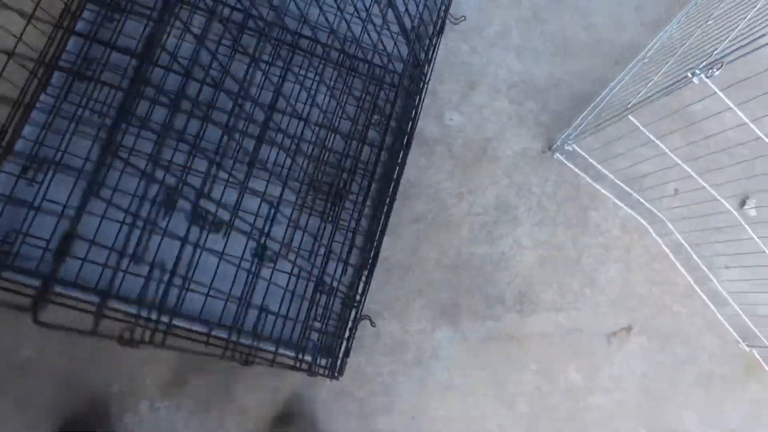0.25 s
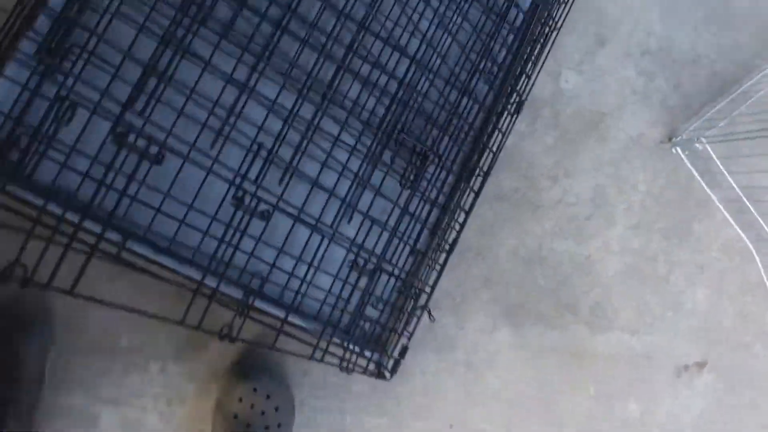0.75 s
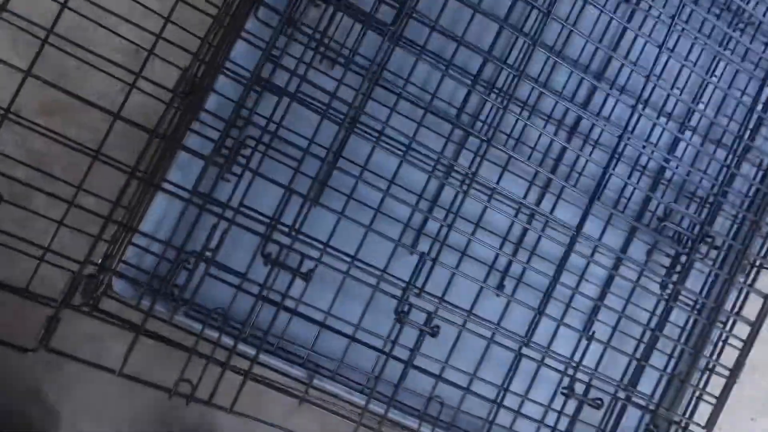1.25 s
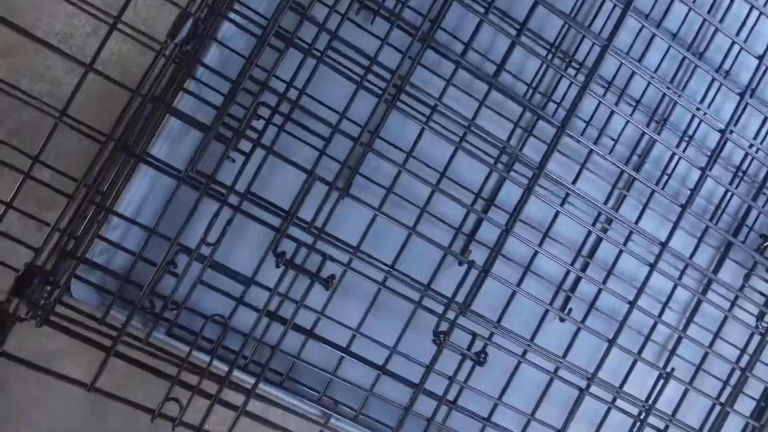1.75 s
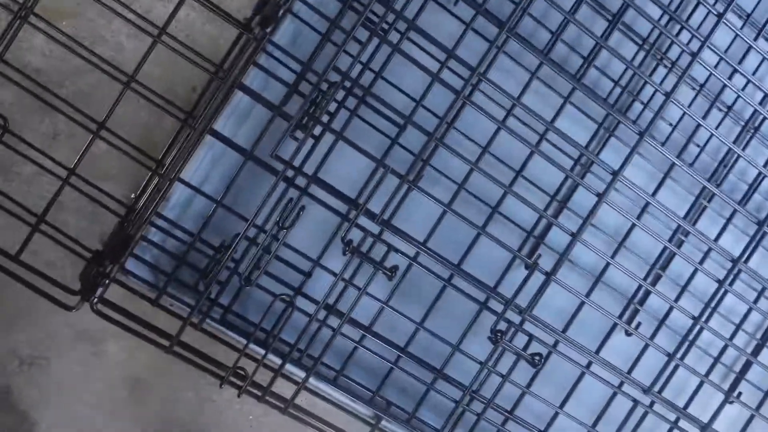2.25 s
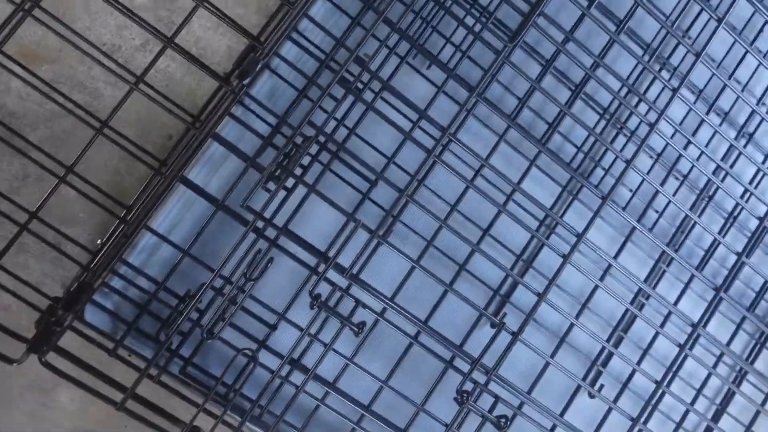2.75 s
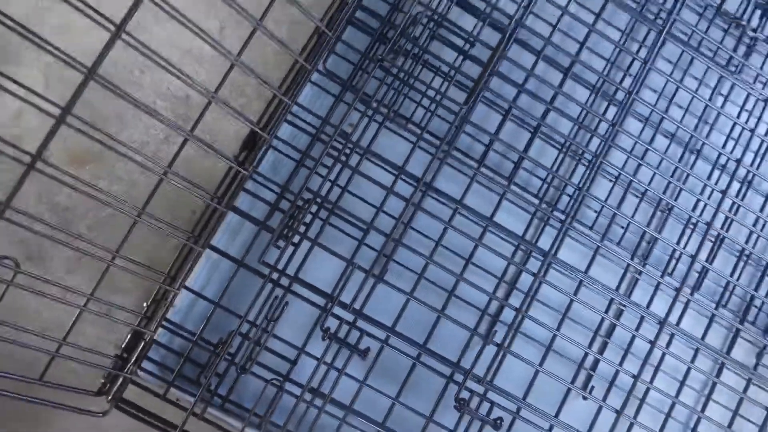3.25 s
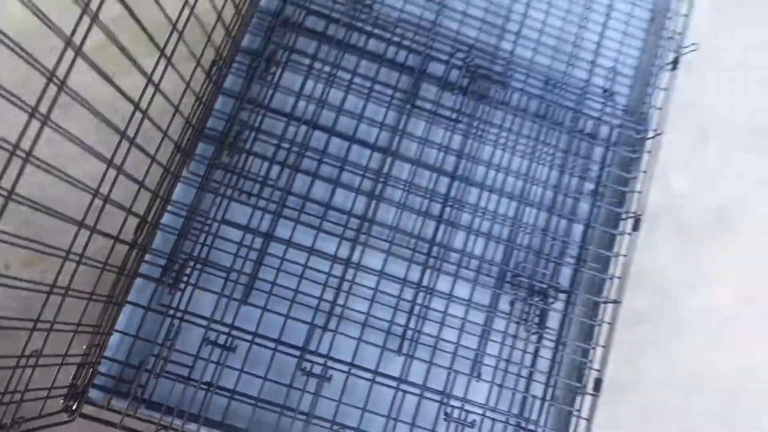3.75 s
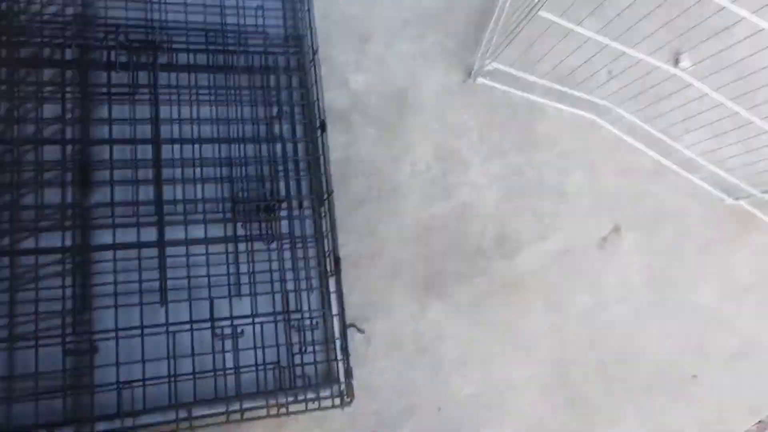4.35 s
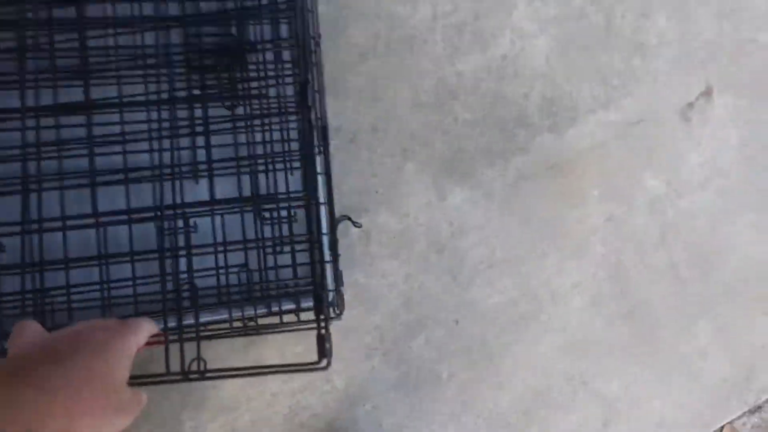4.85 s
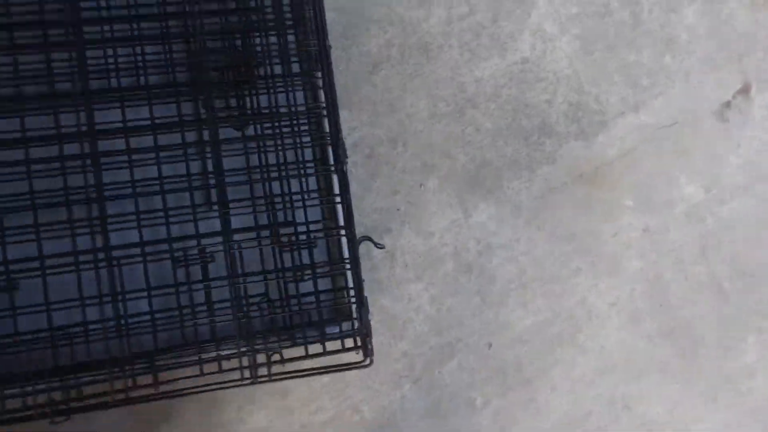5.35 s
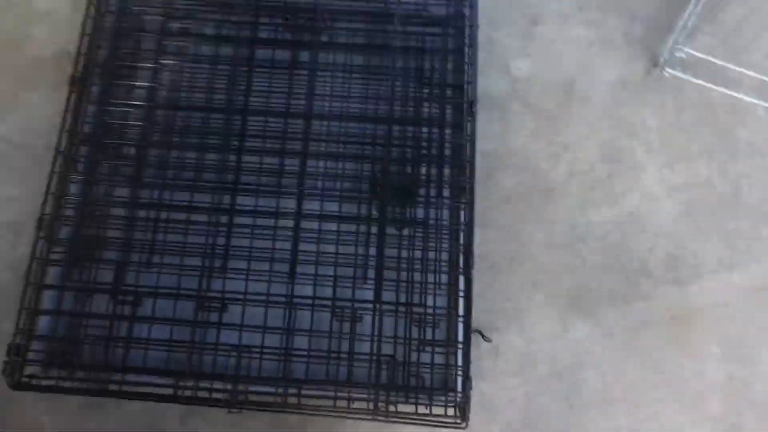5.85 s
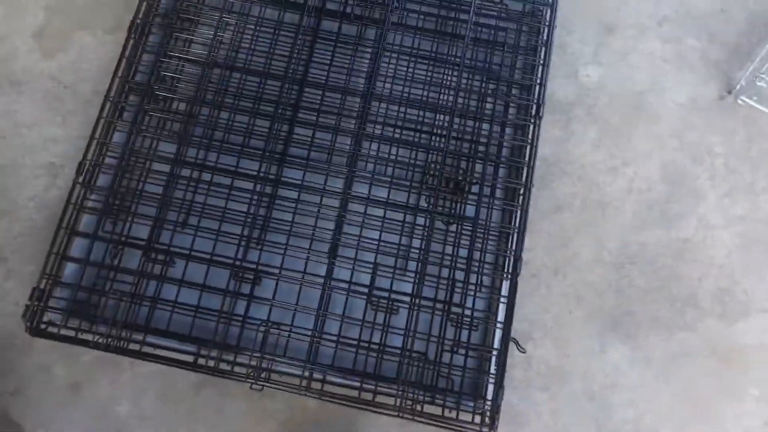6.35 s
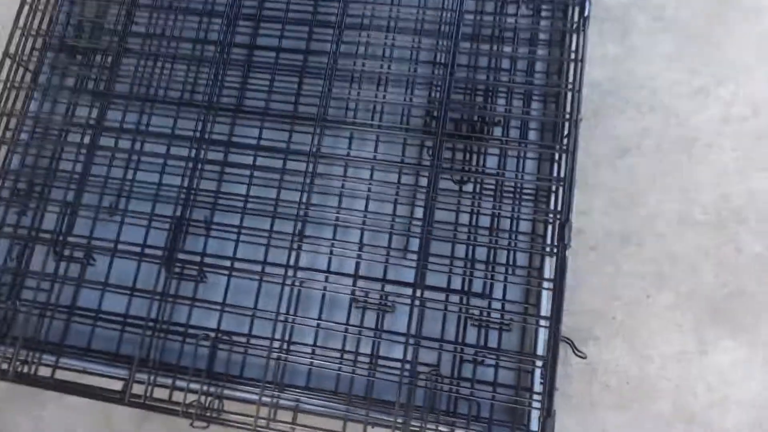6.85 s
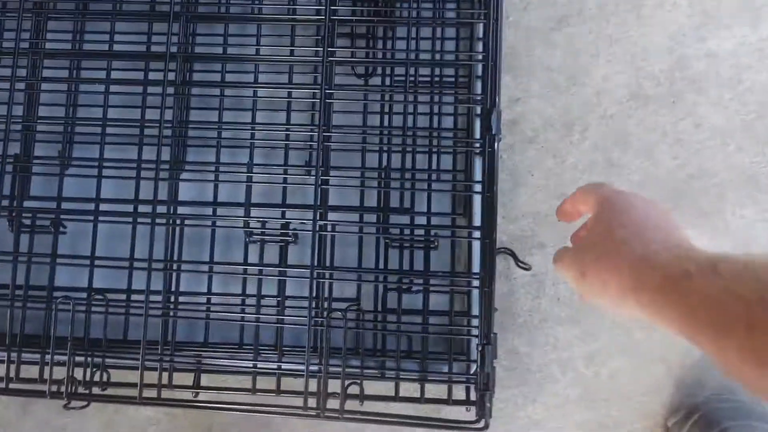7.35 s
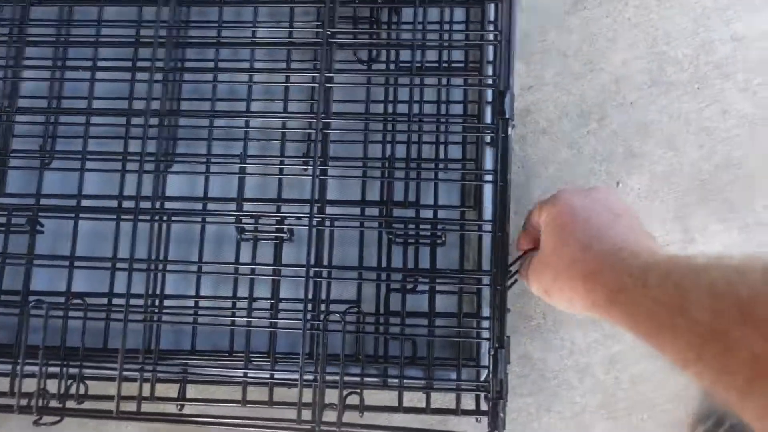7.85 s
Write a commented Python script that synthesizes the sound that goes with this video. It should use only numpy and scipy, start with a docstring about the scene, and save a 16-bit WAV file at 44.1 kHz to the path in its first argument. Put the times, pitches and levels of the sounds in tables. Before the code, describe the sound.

Many thin metal wires strike each other in swarms, bright and clattery, with duller frame knocks and a faint thump underneath. Two busy passages of clashing are separated by a lull with sparse ticks. After the second, the noise drops to thin jingling over quiet air, a soft shoe scuff and a few dry metal clicks. Close stereo pickup, with short echoes from hard walls and floor.

```python
"""Hard-walled space with a concrete floor, stereo microphone on a camera close to the action.
A folding steel wire crate is collapsed and dragged: swarms of tiny wire-on-wire contacts ring banks of
decaying modes for the frame, the mesh panels and the long and short wires. Shakes swell and die, blows
start bursts of rattle; tones of wires, tray and latch clicks ring out and the floor tray hums, all resonant
noise. Rumble, a groan, scuffing soles and a wavering hum are shaped noise too; sparse echoes answer over air."""
import sys
import numpy as np
from scipy import signal
from scipy.fft import rfft, irfft
from scipy.io import wavfile
from scipy.ndimage import uniform_filter1d

SR = 44100
rng = np.random.default_rng(int(sys.argv[2]) if len(sys.argv) > 2 else 0)


def bounce(signal):
    """Save signal as a 16-bit WAV file at the path given by the first command-line argument."""
    frames = np.transpose(np.atleast_2d(signal))
    limited = np.clip(frames, -1, 1)
    pcm = np.round(limited * 32767).astype(np.int16)
    wavfile.write(sys.argv[1], SR, pcm)


N = 357651  # length in samples

# Spectrum of the air noise, relative: pitch_hz, level_db
AIR_COLOUR = [(150, -35), (250, -44), (324, -0.5), (951, 5.5), (1020, 4), (1070, 0), (10800, -22),
              (11800, -43), (15800, -50)]
AIR_DB = -50  # rms
# Low rumble of the place and footsteps: time_s, level_db; then its relative spectrum: pitch_hz, level_db
RUMBLE_LEVEL = [(0, -71), (.5, -60), (2.3, -59), (2.7, -87), (3.5, -71.5), (3.68, -52), (3.9, -57),
                (3.98, -62), (4.6, -58), (5.7, -63), (6.08, -69), (7.1, -61), (7.5, -62.5), (8.11, -58.5)]
RUMBLE_COLOUR = [(13, -63), (22, -33), (54, -15), (107, -12), (124, -5.5), (141, -16), (166, -3.5),
                 (244, 2), (300, 7), (390, -2.5), (660, -120)]
# The shaken frame thumps the floor: level, exponent on the frame's power, smoothing time
THUMP_DB, THUMP_EXPONENT, THUMP_S = -38.5, 0.65, 0.028
# Faint jingle that never stops: time_s, level_db; then one offset_db for each part
JINGLE = [(0, -41.5), (.6, -55), (.9, -40.5), (1.2, -41), (2.6, -47.5), (2.85, -45), (3.7, -45),
          (4.4, -42.5), (5.1, -40), (6.0, -60), (6.2, -45), (6.32, -53), (7.0, -45.5), (7.55, -54),
          (8.11, -49.5)]
JINGLE_OFFSETS = [-14, -1.4, -5, -17.5]
# Shakes of the crate: start_s, rise_s, hold_s, t60_s (before the division by SHAKE_FADE),
# frame_db, mesh_db, long_wires_db, short_wires_db
SHAKES = [(0.034, .06, .02, 1, -56, -43.5, -43, -54), (0.183, .04, 0.085, 1.6, -45, -37, -35.5, -37.5),
          (0.235, 0.082, 0.13, 3, -36.5, -30.5, -36, -37), (0.714, 0.057, 0.0043, 0.2, -40, -33, -49, -50),
          (0.984, 0.09, 0.0082, 0.56, -42.5, -37.5, -36, -37.5),
          (1.244, 0.019, 0.0044, .15, -34, -41, -39, -63),
          (1.302, 0.023, 0.0039, 0.97, -29, -24, -28.5, -30.5),
          (1.437, 0.037, .02, 0.87, -41.5, -29.5, -31, -33),
          (1.572, 0.06, .01, 0.65, -40, -38.5, -40.5, -46.5),
          (1.745, 0.013, .07, 0.27, -45, -33.5, -37, -37), (1.8, 0.1, 0.3, 1.8, -30.5, -23.5, -25, -24.5),
          (2.656, 0.082, .01, .7, -54, -44, -48, -48.5), (2.833, 0.13, 0.0058, .8, -55, -43, -42, -53),
          (3.034, 0.096, .005, .6, -52, -41.5, -39, -50), (3.218, .1, .005, 0.62, -56, -43.5, -41.5, -51.5),
          (3.406, 0.032, .03, 0.55, -55, -43.5, -45, -57),
          (3.484, 0.032, 0.034, 0.77, -45.5, -51, -61, -62), (3.624, 0.031, .01, 1, -48, -39.5, -43, -51),
          (3.794, 0.017, 0.077, 0.78, -45.5, -36.5, -38.5, -39),
          (3.894, 0.055, 0.21, 1.1, -57, -38.5, -45, -52.5), (4.175, 0.02, 0.022, .9, -45, -36.5, -35, -37),
          (4.255, 0.043, .06, .3, -52, -35, -37, -48), (4.453, 0.013, 0.0055, 0.3, -31.5, -31, -43, -50),
          (4.486, 0.032, 0.011, 1.25, -36, -26.5, -29, -28.5),
          (4.62, 0.05, .12, .6, -42.5, -40, -40, -46.5), (4.802, .03, .005, 0.59, -35, -35, -33, -41.5),
          (4.901, 0.047, 0.014, 0.38, -29, -25.5, -34, -37),
          (5.064, 0.039, 0.024, 1.2, -32.5, -25.5, -37, -37),
          (5.164, .035, 0.051, 0.24, -31, -23, -33, -36.5), (5.262, 0.034, 0.18, 2.6, -28, -22.5, -28, -26),
          (5.793, 0.051, 0.1, 1, -40, -30.5, -36, -36), (5.972, 0.068, 0.12, .25, -49, -39, -41.5, -43),
          (6.151, 0.032, 0.0075, 0.13, -50, -36.5, -40, -47), (6.32, 0.061, .01, 0.8, -52, -43, -50.5, -59),
          (6.53, 0.066, .02, 3.1, -54.5, -51, -52.5, -59.5), (6.77, 0.16, .005, .6, -50, -41, -38, -53),
          (7.134, 0.022, .17, 0.69, -52, -43.5, -43, -56),
          (7.757, 0.043, 0.017, 0.46, -42.5, -38, -49, -80), (7.839, .016, 0.028, 0.77, -43, -42, -55, -81),
          (8.007, 0.019, 0.053, .4, -60, -43.5, -47, -56)]
# How much faster than the listed t60 each part dies (ratio): frame, mesh, long wires, short wires
SHAKE_FADE = [1.27, 1.27, 1.68, 1.95]
RISE_DB = 17  # a swell starts this far below its top
# Blows that start a burst: start_s, frame_db, mesh_db, long_wires_db, short_wires_db, t60_s;
# the rattle starts BURST_DROP_DB below these levels
BLOWS = [(0.2, -48, -42, -24, -17, 0.17), (0.277, -41, -36, -20, -16, 0.21),
         (0.314, -20, -15, -23, -15.5, 0.14), (.331, -22, -26, -32, -30, .1),
         (.435, -25, -22, -34, -36, .12), (.469, -30, -15, -28, -34, 0.06),
         (.489, -26, -22, -34, -38, 0.091), (0.549, -16, -42, -48, -36, 0.1),
         (0.587, -32, -15.5, -53, -51.5, 0.18), (0.736, -22, -33, -27, -33, 0.14),
         (0.785, -25, -36.5, -42, -38, 0.13), (1.062, -37, -39, -35, -24, 0.16),
         (1.248, -40, -40, -28, -22, 0.18), (1.266, -32, -17, -38, -41, 0.23),
         (1.3, -30, -29, -32, -28, 0.14), (1.313, -14, -9.5, -10, -12.5, 0.098),
         (1.451, -35, -30, -18, -13, 0.16), (1.614, -30, -20, -29, -49, 0.14),
         (1.752, -35, -34, -30, -26, 0.14), (1.776, -25, -27, -34, -26, 0.11),
         (1.796, -20, -32, -28, -15, 0.13), (1.854, -47, -37, -15, -9, 0.42),
         (2.719, -38, -50, -32, -49, 0.14), (2.856, -46, -55, -41, -49, 0.12),
         (2.944, -51, -38, -39, -48, 0.16), (3.113, -42, -29, -34, -36, 0.14),
         (3.289, -43, -30, -38, -45, 0.14), (3.438, -45, -23, -24, -49, 0.1),
         (3.66, -42, -30, -37, -37, 0.14), (3.803, -32, -44, -37, -22, 0.14),
         (3.863, -34, -41, -39, -21, 0.14), (3.996, -34, -24, -28, -49, 0.1),
         (4.08, -28, -31, -30, -55, 0.15), (4.195, -42, -38, -27, -41, 0.14),
         (4.464, -16, -16, -26, -34, 0.17), (4.502, -12, -12, -17, -15, 0.14),
         (4.568, -25, -12.5, -36, -27, 0.14), (4.697, -21, -17, -33, -41, 0.12),
         (4.804, -40, -28, -17.5, -41, 0.14), (4.83, -11.5, -24, -36, -43, 0.14),
         (4.924, -21, -17, -22, -27, 0.14), (5.08, -25, -30, -42, -48, .08),
         (5.095, -13.5, -10, -42, -38, 0.16), (5.217, -26, -25, -31, -17, 0.17),
         (5.266, -27, -25, -20, -10, 0.29), (5.292, -21, -8, -14, -12, 0.21),
         (5.814, -29, -29, -31, -20, 0.14), (6.161, -32, -25, -34.5, -44, 0.2),
         (6.19, -25, -32, -38, -45, 0.15), (6.569, -28, -29, -47, -65, 0.12),
         (6.806, -59, -31, -26, -43, 0.066), (6.845, -37, -38, -44, -51, 0.11),
         (7.096, -41, -48, -27, -41, 0.12), (7.153, -50, -40, -23.5, -41, 0.09),
         (7.758, -47, -38, -34, -64, 0.18), (7.8, -37, -33, -43, -62, 0.14),
         (7.86, -43.5, -32, -45, -75, 0.14), (7.899, -51, -37, -53, -66, 0.14),
         (8.022, -30, -21, -22, -27.5, 0.18)]
BURST_DROP_DB = 15
# Frame, mesh, long wires, short wires: lowest_mode_hz, highest_mode_hz, middle_t60_s, contacts_per_s,
# size_spread_db (per unit of an exponential draw)
PARTS = [(277, 1200, 0.043, 690, 3.5), (694.4, 3900, 0.056, 1000, 0), (2084, 10500, 0.03, 1800, -1),
         (5800, 19000, 0.052, 2200, -1.5)]
# Loudness trend of the modes, before luck and density weighting: pitch_hz, level_db
MODE_COLOUR = [(180, -51), (300, 0.5), (432, 6.5), (477, 4), (622, 7), (974, -0.5), (1290, -2.5),
               (1400, -4), (4550, -2), (9290, -9), (15800, -16.5)]
# Greatest side level against mid of a mode: pitch_hz, level_db
MODE_WIDTH = [(400, -61), (1000, -9.5), (4000, -7), (12000, -4.5)]
# Modes shared by all parts, added on top of them: pitch_hz, width_hz, level_db
SHARED_MODES = [(407, 55, -8), (1010, 16, -19.5), (1310, 35, -6.5), (1750, 20, -41.5), (8450, 100, -11),
                (13800, 51, -28), (14800, 270, -36)]
# Ringing tones of wires, tray and latch clicks: start_s, pitch_hz, width_hz (doubled in a second pass),
# level_db, hold_s (before the decay), t60_s
RINGING_TONES = [(.21, 14900, 150, -46, .05, .1), (.31, 880, 120, -30, 0.026, 0.24),
                 (.41, 14000, 120, -46, 0.028, .08), (.45, 12200, 188, -52, .3, .3),
                 (1.066, 8340, 106.3, -39, 0.028, 0.083), (1.065, 13800, 81.5, -46, 0.031, .15),
                 (1.065, 14800, 120, -52, 0.052, .15), (1.1, 10800, 80, -62, .1, .1),
                 (1.32, 440, 40, -34.5, 0.044, .15), (1.456, 5280, 50, -34, 0.015, 0.09),
                 (1.469, 8420, 70, -30, 0.033, 0.11), (1.794, 8450, 80, -32, 0.017, .1),
                 (1.795, 13800, 70, -28, 0.019, .1), (1.795, 14800, 150, -28, 0.014, .08),
                 (2.311, 8250, 70, -36.5, 0.039, .1), (2.7, 8270, 70, -55, .05, .1),
                 (2.85, 8330, 70, -53, 0.018, 0.094), (3.299, 1695, 60, -53.5, .35, 0.15),
                 (3.59, 12800, 900, -54, .2, .08), (3.6, 5300, 400, -54, 0.084, .1),
                 (3.658, 3170, 197, -44, 0.23, .1), (3.93, 3300, 250, -42.5, 0.2, .2),
                 (4.2, 3180, 250, -48, .18, .1), (3.809, 410, 70, -45, .25, .2),
                 (4.2, 416, 70, -46, 0.15, .1), (6.85, 1010, 30, -58, 1.1, .3),
                 (3.7, 2330, 100, -48, .3, .1), (3.81, 820, 59.7, -42, 0.05, .1),
                 (4.2, 14650, 150, -55, 0.04, .1), (4.2, 5260, 101, -43, 0.02, .08),
                 (4.2, 1310, 60, -46, 0.092, 0.062), (4.466, 1280, 202, -25, 0.0057, 0.096),
                 (4.5, 431, 40, -37, .15, .2), (4.54, 8600, 90, -40, 0.071, .1),
                 (4.834, 1150, 200, -22.5, 0.013, 0.074), (4.97, 10040, 90, -51, 0.092, .2),
                 (5.098, 1320, 250, -24.5, 0.025, .08), (5.097, 2200, 500, -34, 0.044, .08),
                 (5.13, 13900, 120, -50, 0.043, .1), (5.41, 8360, 100, -34, 0.039, .1),
                 (5.451, 5860, 60, -39, .25, 0.18), (5.82, 12400, 293, -53, .3, .4),
                 (7.0, 11400, 62.25, -61, 0.14, 0.24), (7.202, 11200, 39.8, -64, .33, .1),
                 (7.68, 11400, 40.2, -74, 0.061, 0.09), (7.81, 7740, 201, -62, 0.018, 0.067),
                 (7.811, 2130, 400, -33, 0.003, 0.03), (7.811, 1750, 78.4, -41, .01, 0.071),
                 (7.851, 1650, 200, -37, .004, 0.035), (7.851, 3200, 300, -40, .004, .03),
                 (7.877, 1900, 250, -39, .004, .04), (7.861, 1610, 350, -30, 0.003, 0.04),
                 (7.862, 3220, 500, -34.5, 0.003, .03), (7.895, 1310, 60, -40, .01, .08),
                 (7.897, 1820, 80, -38, 0.0076, 0.064), (8.025, 1310, 70, -36, 0.022, 0.08),
                 (8.022, 2510, 200, -36, 0.008, 0.087), (8.021, 3400, 600, -32, 0.0066, 0.17),
                 (8.022, 4300, 120, -45, 0.0027, 0.027)]
# Hum of the shaken floor tray: start_s, rise_s, hold_s, t60_s (before the division by 0.98), level_db
TRAY_SWELLS = [(.02, 0.065, .01, .6, -53), (.2, 0.22, .4, 2.2, -65), (.9, 0.23, .01, 0.71, -47),
               (1.25, 0.093, 0.26, 1.4, -40), (1.75, 0.34, 0.16, 1.9, -33), (2.85, .1, .2, 2.3, -50.5),
               (3.4, .2, .01, .9, -58), (4.4, 0.12, .05, 2.2, -46), (4.7, 0.34, 0.096, 1.2, -40),
               (5.35, 0.22, .02, .7, -41), (5.8, .09, 0.011, 0.43, -55), (6.1, 0.51, 0.44, 3.5, -53.5)]
# Wavering hum: time_s, pitch_hz, level_db
HUM_PATH = [(0, 121, -88), (6.3, 116.7, -84.5), (7.1, 115.6, -73), (8.11, 115.8, -68.5)]
# Groan of the dragged crate, sliding down: time_s, pitch_hz, level_db
GROAN_PATH = [(3.58, 336, -64), (3.66, 299, -56), (3.72, 190, -57), (3.8, 120, -69), (3.88, 90, -74),
              (3.96, 75, -76)]
# Soft soles on concrete: start_s, rise_s, hold_s, t60_s (before the division by 0.98), level_db
SCUFF_SWELLS = [(6.81, 0.16, 0.0066, 0.7, -40), (7.03, 0.074, 0.017, 0.25, -55),
                (7.15, .005, 0.054, .9, -42), (7.17, 0.14, 0.037, .17, -38.5)]
# Place of the crate as the camera turns: time_s, left_over_right_db
PAN = [(0, 0), (.3, 0.1), (.78, 0.5), (.9, -1), (1.7, -1.5), (2.6, -2.5), (3.5, -2.5), (3.85, -0.2),
       (4.5, 0.7), (5.2, 1.3), (5.9, -0.5), (6.3, -0.5), (6.8, -0.5), (7.3, 0.3), (7.85, -1), (8.11, -1.5)]
# Echoes of the hard walls: pitch_hz, t60_s
WALL_DECAY = [(300, 0.29), (1500, 0.95), (5000, 0.5), (14000, 0.88)]


def gain_of(db):
    """Decibels to amplitude."""
    return 10 ** (np.asarray(db) / 20)


def evened(x):
    """Scales to rms 1."""
    return x / np.sqrt(np.mean(x ** 2) + 1e-20)


def read(points, hz):
    """Reads a spectrum on a log-frequency axis."""
    f, value = np.transpose(points)
    return np.interp(np.log(hz + 1), np.log(f + 1), value)


def curve(rows):
    """Joins rows of (time_s, value) by straight lines."""
    s, value = np.transpose(rows)
    return np.interp(np.arange(N) / SR, s, value)


def add(mix, s, sound):
    """Adds a sound at a time in seconds, cut at the end of the mix."""
    part = mix[round(s * SR):][:len(sound)]
    part += sound[:len(part)]


def resonate(x, hz, width):
    """One resonance of gain 1 that can follow a pitch curve: shift down, smooth, shift back."""
    turn = np.exp(2j * np.pi * np.cumsum(hz * np.ones(x.shape[-1])) / SR)
    r = np.exp(-np.pi * width / SR)
    smooth = signal.lfilter([1 - r], [1, -r], x / turn)
    return 2 * (turn * smooth).real


def steep_noise(hz, width):
    """Noise through the same resonance twice, at rms 1."""
    once = resonate(rng.standard_normal(N), hz, width)
    return evened(resonate(once, hz, width))


def fuzzy_tone(rows, width):
    """Steep resonant noise following rows of (time_s, pitch_hz, level_db)."""
    s, hz, db = np.transpose(rows)
    t = np.arange(N) / SR
    tone = steep_noise(np.interp(t, s, hz), width)
    return gain_of(np.interp(t, s, db, -120, -120)) * tone


def swells(rows, rest_db, fade=0.98):
    """Power over time: each row swells, holds and dies away over a resting level."""
    power = gain_of(rest_db) ** 2 * np.ones(N)
    for start, rise, hold, listed_t60, db in rows:
        t60 = listed_t60 / fade
        t = np.arange(0, rise + hold + t60, 1 / SR)
        rise_db = -RISE_DB * np.maximum(1 - t / rise, 0)
        fall_db = -60 * np.maximum(t - rise - hold, 0) / t60
        add(power, start, gain_of(db + rise_db + fall_db) ** 2)
    return power


def shaking(column):
    """Amplitude of one part's chatter: jingle, shakes and the dying burst after each blow."""
    rows = [(*row[:4], row[4 + column]) for row in SHAKES]
    power = swells(rows, curve(JINGLE) + JINGLE_OFFSETS[column], SHAKE_FADE[column])
    t = np.arange(SR // 2) / SR
    impact = 1 + 1.85 * np.exp(-t / 0.00085)  # extra power of the blow itself, before the rattle
    for s, *parts_db, t60 in BLOWS:
        burst_db = parts_db[column] - BURST_DROP_DB - 60 * t / t60
        add(power, s, impact * gain_of(burst_db) ** 2)
    return np.sqrt(power)


def air():
    """Quiet patchy noise of the place, more alike in both channels at low pitch than at high."""
    frames, hz = N // 256 + 5, np.fft.rfftfreq(1024, 1 / SR)
    a, b, c, d, patches = rng.standard_normal((frames, 513, 5)).T
    patches = uniform_filter1d(patches, 10, 0)  # over frequency
    patches = evened(uniform_filter1d(patches, 12, 1))  # over time
    same = read([(100, .99), (1000, 0.75), (8000, 0.12)], hz)[:, None]
    left = a + 1j * b
    right = same * left + np.sqrt(1 - same ** 2) * (c + 1j * d)
    z = np.array([left, right]) * gain_of(read(AIR_COLOUR, hz)[:, None] + 1.4 * patches)
    noise = signal.istft(z, nperseg=1024, noverlap=768)[1][:, :N]
    return gain_of(AIR_DB) * evened(noise)


def rumble():
    """Dull low noise, nearly alike in both ports of the microphone, rising when the frame is shaken."""
    frame = np.abs(uniform_filter1d(shaking(column=0) ** 2, round(THUMP_S * SR)))
    power = gain_of(curve(RUMBLE_LEVEL)) ** 2 + gain_of(THUMP_DB) ** 2 * frame ** THUMP_EXPONENT
    noise = rng.standard_normal(N) + 0.075 * rng.standard_normal((2, N))
    colour = gain_of(read(RUMBLE_COLOUR, np.fft.rfftfreq(N, 1 / SR)))
    return np.sqrt(power) * evened(irfft(rfft(noise) * colour, N))


def spot_rings(column, count, size):
    """Stereo ring of each contact spot: a bank of decaying modes, each with its own direction."""
    low_hz, high_hz, middle_t60 = PARTS[column][:3]
    t = np.arange(3072) / SR
    place, life, luck, sign, lean = rng.random((5, count, size, 1))
    position = (np.arange(size)[:, None] + place) / size
    hz = low_hz * (high_hz / low_hz) ** position
    t60 = middle_t60 * 5.2 ** (life - .5)
    bell = np.sin(np.pi * position)  # the ranges of the parts fade into each other
    density = np.sqrt(hz / t60)  # modes thin out upwards, so each carries more
    level = bell * gain_of(read(MODE_COLOUR, hz) + 10 * luck) * density
    modes = np.sign(sign - .5) * level * gain_of(-60 * t / t60) * np.sin(2 * np.pi * hz * t)
    modes *= 1 - np.exp(-1.5 * low_hz * t)  # a contact takes a moment, heavier parts longer
    mid = modes.sum(1)
    # high modes beam to one port more than low ones
    side = ((2 * lean - 1) * gain_of(read(MODE_WIDTH, hz)) * modes).sum(1)
    energy = np.sqrt(np.mean(np.sum(mid ** 2, 1)))
    return np.array([mid + side, mid - side]) / energy


def chatter(column, clinks, count=16, size=32):
    """Random wire contacts in one part, each ringing one of several spots."""
    per_s, spread_db = PARTS[column][3:]
    sizes = gain_of(spread_db * np.minimum(rng.exponential(1, N), 4))
    hits = sizes * (rng.random(N) < per_s / SR)
    hits += clinks
    blow_at = np.round(np.transpose(BLOWS)[0] * SR).astype(int)
    hits[blow_at] = gain_of(3.0)  # each blow starts with one firm contact
    hits = evened(hits * rng.choice([-1, 1], N)) * shaking(column)
    turn = np.cumsum(rng.random(N) < 40 / SR)
    lingering = rng.integers(0, count, N)[turn]  # one spot rattles for a while
    spot = np.where(rng.random(N) < .3, lingering, rng.integers(0, count, N))
    rings = np.float32(spot_rings(column, count, size))
    out = 0
    for k in range(count):
        struck = np.float32(hits * (spot == k))[None]
        out = out + signal.oaconvolve(struck, rings[:, k], axes=1)[:, :N]
    return out


def wire_parts():
    """All parts chatter together, with the strong shared modes lifted."""
    # larger contacts ring every part at once
    clinks = gain_of(2.7 * np.minimum(rng.exponential(1, N), 3)) * (rng.random(N) < 70 / SR)
    x = sum(chatter(k, clinks) for k in range(len(PARTS)))
    return x + sum(gain_of(db) * resonate(x, hz, width) for hz, width, db in SHARED_MODES)


def hum():
    """Wavering low hum: noise in a narrow moving resonance."""
    return fuzzy_tone(HUM_PATH, 15)  # width in Hz


def walls(x):
    """Sparse echoes of random sign for each ear, each band dying at its own speed."""
    taps = np.zeros((2, SR // 2))
    at = np.arange(200, SR // 2 - 20, 20) + rng.integers(0, 20, (2, (SR // 2 - 201) // 20))
    np.put_along_axis(taps, at, rng.choice([-1., 1.], at.shape), 1)
    taps[1] = 0.34 * taps[0] + 0.38 * taps[1]  # the ports are close, so the echoes are partly shared
    hz, t, z = signal.stft(taps, SR, nperseg=256)
    decay = gain_of(-60 * t / read(WALL_DECAY, hz)[:, None])
    tail = signal.istft(z * decay, SR, nperseg=256)[1]
    return signal.fftconvolve(x[None], tail / np.linalg.norm(tail[0]), axes=1)[:, :N]


def tray():
    """The floor tray hums on after it is shaken: swelling noise in a resonance at 637 Hz."""
    return np.sqrt(swells(TRAY_SWELLS, rest_db=-62)) * steep_noise(637, width=108)


def ringing_tones():
    """Ringing tones of wires, tray and latch clicks: noise drives one resonance, held and then decaying."""
    out = np.zeros(N)
    for s, hz, width, db, hold, t60 in RINGING_TONES:
        t = np.arange(0, hold + t60, 1 / SR)
        push = rng.standard_normal(max(len(t), SR // 4))
        push[0] = 0.81 * np.sqrt(SR / width)  # a first kick sets the resonance going at once
        tone = resonate(resonate(push, hz, width), hz, 2 * width)
        fall_db = -60 * np.maximum(t - hold, 0) / t60
        add(out, s, evened(tone)[:len(t)] * gain_of(db + fall_db))
    return out


def groan():
    """Low groan of the dragged crate: noise in a resonance sliding down."""
    return fuzzy_tone(GROAN_PATH, 35)  # width in Hz


def scuffs():
    """Soft soles scuff the concrete: swelling noise in a broad resonance at 3470 Hz."""
    return np.sqrt(swells(SCUFF_SWELLS, rest_db=-np.inf)) * steep_noise(3470, width=2700)


def scene():
    """The crate and soles, placed left or right as the camera turns, in their space."""
    pan = gain_of(curve(PAN) / 2 * np.array([[1], [-1]]))
    crate = (wire_parts() + ringing_tones() + tray() + scuffs()) * pan
    # thin wire moves no air in the bass
    crate = signal.sosfilt(signal.butter(5, 370, "high", fs=SR, output="sos"), crate)
    echoes = gain_of(-14) * walls(crate.mean(0))
    return crate + echoes + air() + rumble() + groan() + hum()


def record(dry):
    """The band limit of the recorder: a steep low-pass at 16050 Hz."""
    lowpass = signal.firwin(511, 16050, window=("kaiser", 9), fs=SR)
    return signal.oaconvolve(dry, lowpass[None], "same")


dry = scene()
out = record(dry)
bounce(out)
```